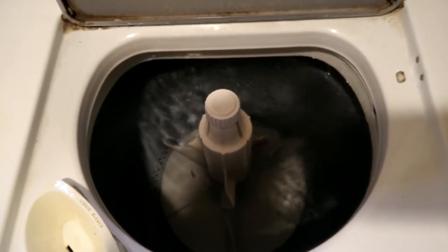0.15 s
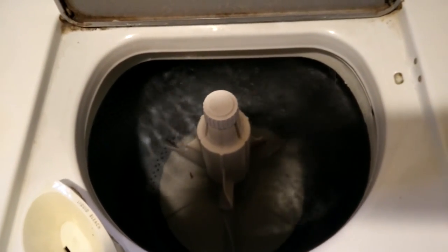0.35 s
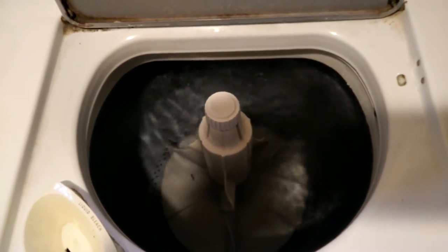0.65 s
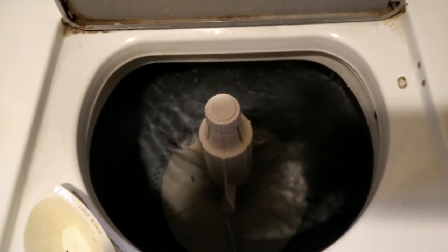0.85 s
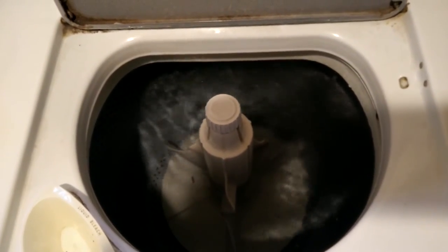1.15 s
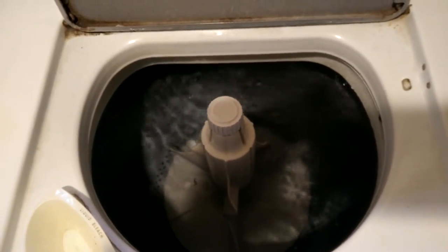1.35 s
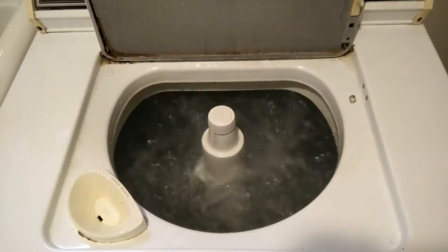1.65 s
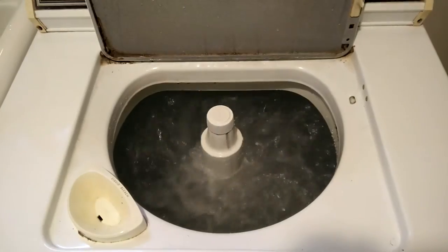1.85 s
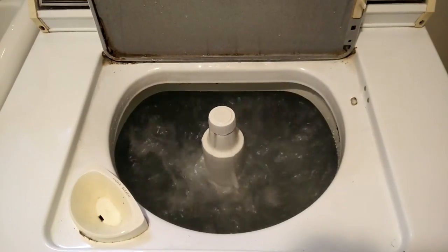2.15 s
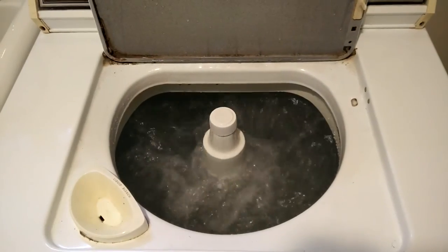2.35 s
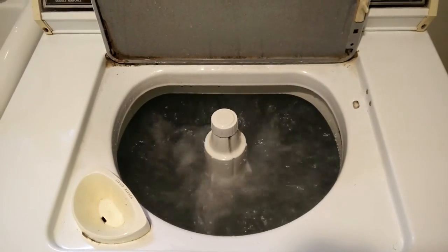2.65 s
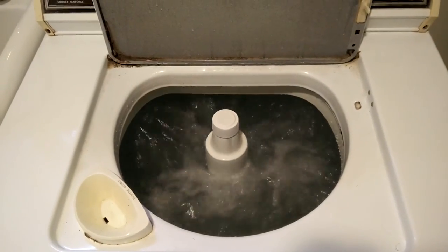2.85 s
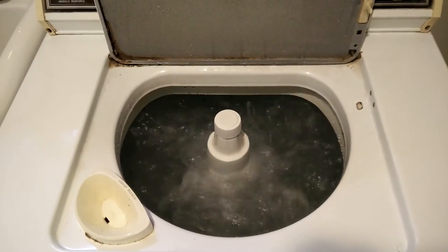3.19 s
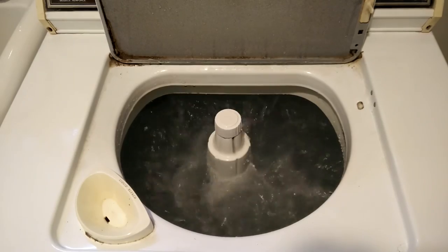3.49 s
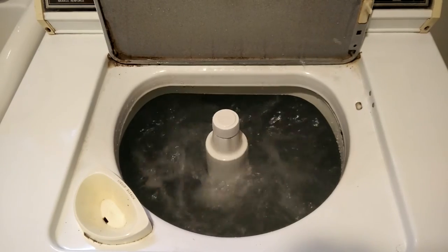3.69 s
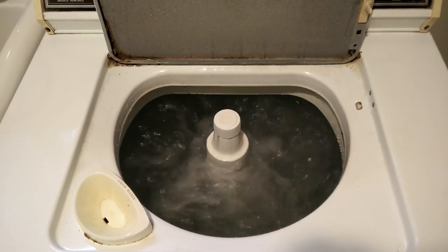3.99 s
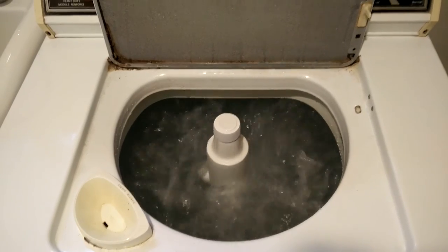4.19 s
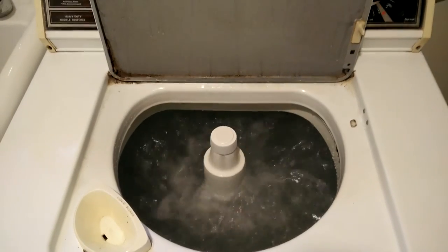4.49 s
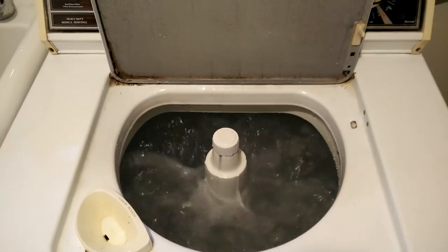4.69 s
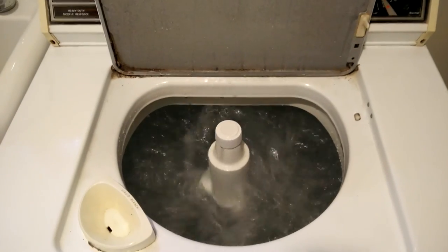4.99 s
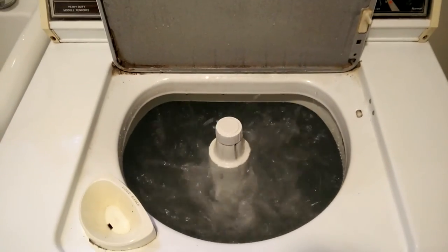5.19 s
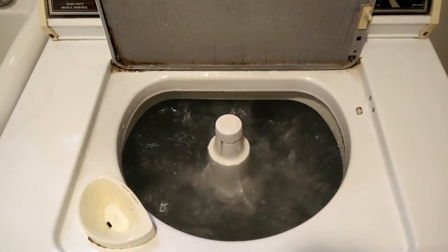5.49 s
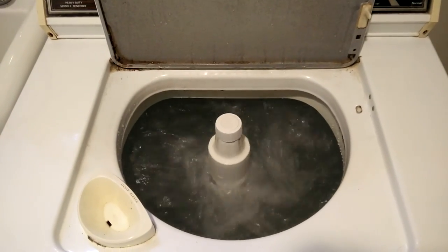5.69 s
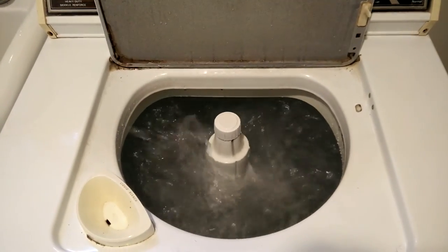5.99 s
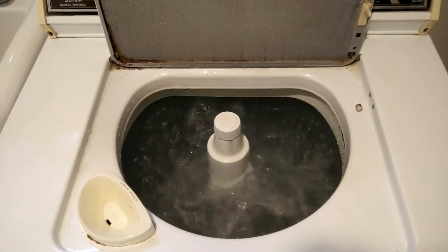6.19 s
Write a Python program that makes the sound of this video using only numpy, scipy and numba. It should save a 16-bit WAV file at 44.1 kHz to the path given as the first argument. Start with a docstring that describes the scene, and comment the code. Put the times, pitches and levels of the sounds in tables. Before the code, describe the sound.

Heard from just above an open top-loading washer, water pours into the part-filled tub with a steady hissing spray and gurgle, then cuts off. Half a second of silence follows. Then churning water fades in, sloshing, bubbling and splashing against the steel walls, while the motor hums low and swells with each stroke, the cabinet rumbles and the agitator gives an occasional soft thud.

```python
"""Water gushes and spatters, stops short, then after a brief silence sloshes over a hum and a rumble.
A top-loading washer, heard from above the open lid: a jet fills the tub, then the agitator churns it.
Drops and bubbles ring all over the surface as short rising sines, smeared by the steel walls.
The motor hums at multiples of the mains frequency, the cabinet rumbles, the agitator thuds."""
import sys
import numpy as np
from scipy import signal
from scipy.fft import rfft, irfft, next_fast_len
from scipy.io import wavfile
from scipy.ndimage import uniform_filter1d
from numba import njit

SR = 44100
rng = np.random.default_rng(int(sys.argv[2]) if len(sys.argv) > 2 else 0)


def unload_audio(sound):
    """Save the sound as a 16-bit wav file, at the path given as the first command line argument."""
    columns = np.transpose(np.atleast_2d(sound))
    # keep every value between -1 and 1, then stretch to whole-number steps
    steps = np.round(np.clip(columns, -1, 1) * 32767)
    wavfile.write(sys.argv[1], SR, steps.astype(np.int16))


N = 279594

# single splashes: t/s, level/dB, f/Hz, left minus right/dB
SPLASHES = [(0.1103, -9.5, 6960, -3), (0.4577, -13.5, 4650, 3), (0.587, -16, 4500, 4),
            (0.6396, -10, 8300, -2.5), (0.7651, -5.5, 7300, 1), (1.15, -17, 4330, -2),
            (1.284, -21, 5290, -2), (2.157, -17, 3735, 7), (2.2684, -19, 6160, 5), (2.5673, -13, 5930, 4),
            (2.6321, -9, 5170, 12), (2.674, -13, 5600, 17), (2.722, -7.5, 6400, 3), (2.866, -14, 6070, 7),
            (2.935, -3, 6500, 7), (3.3313, -9.5, 5930, 8), (3.403, -8.5, 7050, 11), (3.4322, -10, 3210, 13),
            (3.494, -17, 5640, 4), (3.5527, -8.5, 5530, 9), (3.7305, -16, 3550, 8), (3.9784, -7, 5700, 12),
            (4.1776, -3, 13600, 4), (4.2642, -11, 5590, 3), (4.3415, -9, 5650, 11), (4.576, -4.5, 5930, 9),
            (4.675, -13.5, 3830, 14), (4.698, -10, 5900, 10), (4.732, -9, 6470, 8), (4.944, -13, 5900, 10),
            (5.0916, -8, 5550, 12), (5.141, -9, 5900, 7), (5.2154, -6, 4900, 11), (5.235, -16, 5750, 6),
            (5.281, -15, 5500, 8), (5.4365, -17, 3530, 5), (5.4948, -13, 5700, 5),
            (5.5816, -12.5, 6200, 12), (5.635, -6.5, 5700, 15), (5.715, -6.5, 6870, 12),
            (5.8075, 1, 3680, 6), (6.127, -7, 6030, 13), (6.23, -10, 7140, 4), (6.306, -5.5, 7530, 2)]


def undb(db):
    return 10 ** (np.asarray(db) / 20)


def unit(x):
    """Scale the mid signal to rms 1."""
    return x / np.sqrt(np.mean(np.mean(x, axis=0) ** 2))


def colour(x, spectrum, modes=()):
    """Filter by a spectrum table, with resonance peaks and dips on top."""
    size = next_fast_len(N)
    hz = np.maximum(np.arange(size // 2 + 1) * SR / size, 1)
    points_hz, *columns_db = np.transpose(spectrum)
    db = np.array([np.interp(np.log(hz), np.log(points_hz), column) for column in columns_db])
    for centre_hz, width_hz, boost_db in modes:
        db = db + boost_db / (1 + (2 * (hz - centre_hz) / width_hz) ** 2)
    return irfft(rfft(x, size) * undb(db), size)[:, :N]


def walk(rate_hz):
    """Random levels joined by ramps; spread near 1."""
    hold = int(SR / rate_hz)
    return 1.56 * uniform_filter1d(np.repeat(rng.standard_normal(N // hold + 1), hold), hold)[:N]


def surges(rate_hz, decay_s, depth, at_s=()):
    """Gain that jumps at random, by the full depth at the given times, and decays to 1."""
    kicks = depth * rng.random(N) ** 2 * (rng.random(N) < rate_hz / SR)
    kicks[(np.array(at_s) * SR).astype(int)] = depth
    return 1 + signal.lfilter([1], [1, -np.exp(-1 / (decay_s * SR))], kicks)


def swells(crest_s, length_s, peak_db, calm_db, rise_over_fall=1):
    """Level/dB of a calm floor plus bell-shaped swells, summed in power."""
    t = np.arange(0, N + 64, 64) / SR
    place = 2 * (t[:, None] - crest_s) / length_s
    bells = undb(peak_db) ** 2 * np.exp(-(place / np.where(place < 0, rise_over_fall, 1)) ** 2)
    return np.interp(np.arange(N) / SR, t, 10 * np.log10(undb(calm_db) ** 2 + bells.sum(axis=1)))


@njit
def ring(start, hz, t60_s, glide, left, right, samples):
    """Each bubble is a sine that swells within a cycle, then decays as its pitch climbs."""
    out = np.zeros((2, samples))
    for k in range(len(start)):
        steps = int(t60_s[k] * SR * 2 / 3) + 2  # down to -40 dB
        pole = np.exp(2j * np.pi * hz[k] / SR - np.log(1000) / (t60_s[k] * SR))
        chirp = np.exp(2j * np.pi * hz[k] * glide / (SR * steps))
        phasor, onset_gap, gap_decay = 1. + 0j, 1., np.exp(-2 * hz[k] / SR)
        for i in range(start[k], min(start[k] + steps, samples)):
            out[0, i] += (phasor * left[k]).imag * (1 - onset_gap)
            out[1, i] += (phasor * right[k]).imag * (1 - onset_gap)
            phasor *= pole
            pole *= chirp
            onset_gap *= gap_decay
    return out


def bubbles(start_s, hz, t60_s, size, pan_db, glide):
    """Bubbles spread over the surface: each reaches one channel slightly ahead in phase."""
    lag_spread_s = .00011
    lead = np.exp(1j * np.pi * hz * lag_spread_s * rng.standard_normal(len(start_s)))
    left, right = size * undb(pan_db / 2) * lead, size * undb(-pan_db / 2) / lead
    return ring((start_s * SR).astype(np.int64), hz, t60_s, glide, left, right, N)


def froth(per_s, lo_hz, hi_hz, max_cycles, scatter_db, gain):
    """Dense crowd of bubbles, short and long ringing, some larger than the rest."""
    when, pitch, bulk, polarity, length = rng.random((int(per_s * N / SR), 5)).T
    start_s = when * (N - 1) / SR
    hz = lo_hz * (hi_hz / lo_hz) ** pitch
    cycles = 6 * (max_cycles / 6) ** length
    larger_db = np.minimum(-scatter_db * np.log(1 - bulk), 16)
    size = hz / np.sqrt(cycles) * undb(larger_db)  # grows with pitch: the crowd is white
    size = size * np.sign(polarity - .5) * gain[(start_s * SR).astype(int)]
    return bubbles(start_s, hz, cycles / hz, size, pan_db=3 * rng.standard_normal(len(hz)), glide=.15)


def bursts(events, count, spread, cycles, length_s, glide):
    """One tight cluster of bubbles per event, around its pitch; centred if there is no pan column."""
    start_s, level_db, centre_hz, *pan_db = np.repeat(np.array(events), count, axis=0).T
    detune, delay = rng.random((len(start_s), 2)).T
    place = (np.arange(len(start_s)) % count + detune) / count - .5  # evenly across the band
    hz = np.minimum(centre_hz * np.exp(spread * place), .4 * SR)
    size = undb(level_db - 37 * place ** 2) / np.sqrt(count)
    return bubbles(start_s + length_s * delay ** 2, hz, cycles / hz, size, np.sum(pan_db, axis=0), glide)


def filling():
    """The jet gurgles into the tub and throws drops and a steady spray."""
    # water spectrum, relative: f/Hz, left/dB, right/dB
    tone = [(50, -28, -31), (149.8, -14.5, -13), (236, -6.5, -7), (695, -12, -13), (1310, -16, -10),
            (2200, -7.5, -10), (2770, -11, -13), (4360, -8, -7), (6640, -4.5, -4), (7850, -3.5, 0),
            (9500, -12, -12), (12000, -17.5, -13.5), (16000, -19.5, -14.5)]
    # air resonances of the part-filled tub: f/Hz, width/Hz, gain/dB
    tub_modes = [(386.2, 20.5, 15.5), (437.7, 88, -9.5), (535, 110, 9), (822, 16, 8), (970, 40, 1),
                 (1136, 57, 9.5), (1457, 77, 7), (1676, 84, -15.5), (1738, 14, 16), (1875, 27, 9),
                 (2250, 17, 14), (2790, 670, -8.5), (3560, 210, -5.5), (4080, 110, -6.5)]
    gurgle_db, spray_db = -35.5, -29
    splash_s = np.transpose(SPLASHES)[0]
    gurgle = froth(4000, 39.8, 2925, max_cycles=26, scatter_db=0, gain=surges(19, .0274, .15))
    drops = froth(7000, 2400, 5600, max_cycles=60, scatter_db=1.5, gain=surges(10, .012, .79, splash_s))
    spray = froth(14000, 5630, 17000, max_cycles=40, scatter_db=0, gain=surges(17, .0071, .62, splash_s))
    return (unit(colour(gurgle, tone, tub_modes)) * undb(gurgle_db)
            + unit(colour(drops + spray, tone, tub_modes)) * undb(spray_db))


def splashes():
    """Single splashes: small bubbles ring high, almost at once."""
    return bursts(SPLASHES, count=7, spread=.42, cycles=76, length_s=.0024, glide=.23)


def gulps():
    """Large bubbles gulp at lower pitches."""
    # gulps: t/s, level/dB, f/Hz
    events = [(0.415, -21.5, 512), (0.626, -21, 540), (1.12, -22, 1130), (2.565, -17.5, 1970),
              (2.866, -11, 780), (2.927, -13.5, 714), (3.062, -25, 870), (3.411, -11, 1850),
              (3.43, -14.5, 1570), (3.642, -15, 830), (3.662, -16, 820), (4.145, -22, 755),
              (4.261, -14, 850), (4.574, -22, 710), (4.728, -25, 960), (4.941, -17, 1180),
              (5.023, -16.5, 1520), (5.117, -12.5, 1210), (5.773, -15.5, 1950), (5.899, -17, 930)]
    return bursts(events, count=4, spread=.24, cycles=37, length_s=.01, glide=.13)


def tub_echo(x):
    """The steel walls add a short bright tail, different in each channel."""
    t60_s, tail_db, highpass_hz = .04, -12, 2200
    t = np.arange(SR // 10) / SR
    tail = rng.standard_normal((2, len(t))) * np.exp(-np.log(1000) * t / t60_s)
    tail = signal.sosfilt(signal.butter(2, highpass_hz, "high", fs=SR, output="sos"), tail)
    tail = tail * undb(tail_db) / np.sqrt(np.sum(tail ** 2, axis=1, keepdims=True))
    return x + signal.fftconvolve(x, tail, axes=1)[:, :N]


def churning():
    """Waves slosh against the tub and break into spray and mist."""
    # water spectrum, relative: f/Hz, left/dB, right/dB
    tone = [(302, -13.5, -17), (505, -4.5, -8.5), (680, -2, -5), (1260, -8.5, -7), (2020, -8.5, -9),
            (2500, -13, -18.5), (2790, -12, -21), (3660, -2.5, -15), (4570, -8, -14.5), (5540, -0.5, -12),
            (7710, -5.5, -9.5), (9450, -18, -14.5), (12400, -14, -17), (15000, -14, -18)]
    # waves: crest t/s, length/s, spray/dB, slosh/dB
    waves = [(2.106, 0.056, -30.5, -37), (2.239, 0.18, -27.5, -43.5), (2.58, 0.063, -25.5, -33.5),
             (2.677, 0.087, -29.5, -37.5), (2.9, 0.11, -28.5, -32.5), (3.073, 0.16, -24, -33),
             (3.453, .09, -24.5, -35), (3.565, 0.042, -25, -34), (3.66, 0.045, -38, -34.5),
             (3.725, .07, -33, -41), (3.95, .14, -25.5, -36.5), (4.078, 0.093, -23, -33.5),
             (4.205, 0.09, -26, -39.5), (4.28, 0.084, -26, -34), (4.36, 0.077, -27.5, -43),
             (4.47, 0.084, -29.5, -43.5), (4.602, 0.066, -28, -31), (4.713, 0.073, -24.5, -35.5),
             (4.809, 0.11, -25, -34), (4.961, 0.067, -25, -33), (5.111, 0.11, -22, -35.5),
             (5.229, 0.046, -29, -42), (5.398, 0.078, -26.5, -38), (5.587, 0.28, -27.5, -36),
             (5.767, 0.085, -25.5, -40), (5.905, .12, -21, -28.5), (6.024, 0.073, -23, -36),
             (6.13, 0.082, -32, -38.5), (6.28, 0.064, -28.5, -43)]
    calm_slosh_db, calm_spray_db, calm_mist_db = -36.5, -32, -47
    crest_s, length_s, spray_peak_db, slosh_peak_db = np.transpose(waves)
    slosh_db = swells(crest_s, length_s, slosh_peak_db, calm_slosh_db, rise_over_fall=.84)
    spray_db = swells(crest_s, length_s, spray_peak_db, calm_spray_db, rise_over_fall=.84)
    mist_db = calm_mist_db + 1.01 * (spray_db - calm_spray_db)
    breaking = surges(30, .0064, 1.27, at_s=np.transpose(SPLASHES)[0])
    slosh_gain = breaking ** .16 * surges(13, .015, .82)
    slosh = froth(2500, 389.8, 2616, max_cycles=53, scatter_db=1, gain=slosh_gain)
    spray = froth(11000, 2420, 9680, max_cycles=94, scatter_db=2.5, gain=breaking)
    mist_gain = breaking ** 1.43 * surges(12, .0061, 2.3)
    mist = froth(10000, 9040, 16600, max_cycles=70, scatter_db=1, gain=mist_gain)
    layers = (slosh, slosh_db), (spray, spray_db), (mist, mist_db)
    return sum(unit(colour(x, tone)) * undb(db) for x, db in layers)


def mains_hum(harmonic, db):
    """One mains harmonic, wavering in level and phase."""
    mains_hz, pan_db = 60.01, 1.3
    phase = 2 * np.pi * harmonic * mains_hz * np.arange(N) / SR + .6 * walk(3) + .2 * walk(14)
    tone = np.sqrt(2) * undb(db + .8 * walk(25)) * np.sin(phase)
    return tone * undb(np.array([[pan_db], [-pan_db]]) / 2)


def motor():
    """Magnetic pull at 2x and 4x mains, swelling with the load of each stroke."""
    # agitator strokes, forth and back in turn: full load t/s, length/s, 2x level/dB, 4x level/dB
    strokes = [(2.327, 0.18, -29.5, -26.5), (2.64, .16, -31.5, -27), (3.116, .2, -28, -24.5),
               (3.51, .25, -38, -24.5), (3.956, .2, -30.5, -26), (4.31, 0.089, -31, -27),
               (4.832, 0.2, -29.5, -26.5), (5.17, 0.24, -33.5, -26), (5.604, .28, -28.5, -25.5),
               (6.05, 0.45, -32, -24.5)]
    load_s, length_s, second_peak_db, fourth_peak_db = np.transpose(strokes)
    fourth_lag_s = np.resize((.029, .094), len(load_s))  # forth, back
    second_db = swells(load_s, length_s, second_peak_db, calm_db=-38)
    fourth_db = swells(load_s + fourth_lag_s, length_s=.21, peak_db=fourth_peak_db, calm_db=-29)
    return mains_hum(2, second_db) + mains_hum(4, fourth_db)


def cabinet():
    """The panels rumble, nearly alike in both channels, and carry the weaker mains harmonics."""
    # rumble spectrum, relative: f/Hz, level/dB
    tone = [(25, -28), (60, -24), (85, -26), (100, -9.5), (135, -10.5), (160, -11.5), (215, -8.5),
            (270, 3.5), (300, -7.5), (420, -11), (460, -22.5), (700, -42)]
    # weak hum: mains harmonic, level/dB
    weak_hum = [(1, -53.5), (3, -40), (6, -42)]
    rumble_db, side_db = -31, -14
    mid, side = colour(rng.standard_normal((2, N)), tone)
    rumble = unit(mid + undb(side_db) * side * np.array([[1], [-1]])) * undb(rumble_db + 1.3 * walk(6))
    return rumble + sum(mains_hum(harmonic, db + 2.1 * walk(9)) for harmonic, db in weak_hum)


def thuds():
    """Dull thuds as the agitator reverses."""
    # thuds: t/s, level/dB, f/Hz
    events = [(2.94, -19, 156), (3.43, -20, 176), (3.89, -23, 400), (4.015, -14.5, 353), (5.57, -18, 408)]
    return bursts(events, count=3, spread=.35, cycles=42, length_s=.0121, glide=.028)


def scene():
    fill_end_s, fade_out_s, churn_start_s, fade_in_s = 1.455, .0058, 2.028, .28
    t = np.arange(N) / SR
    fade_out = np.clip((fill_end_s - t) / fade_out_s, 0, 1)
    fade_in = np.clip((t - churn_start_s) / fade_in_s, 0, 1) ** .58
    spatter = splashes() + gulps()
    reversals = thuds()
    fill = tub_echo(filling() + spatter) * fade_out
    churn = tub_echo(churning() * fade_in + spatter * (fade_in > 0))
    return fill + churn + reversals + (motor() + cabinet()) * fade_in


def record(dry):
    """The loudest splashes are softly rounded off and the top is cut."""
    cutoff_hz = 15800
    return signal.sosfilt(signal.ellip(12, .2, 100, cutoff_hz, fs=SR, output="sos"), np.tanh(dry))


dry = scene()
out = record(dry)
unload_audio(out)
```